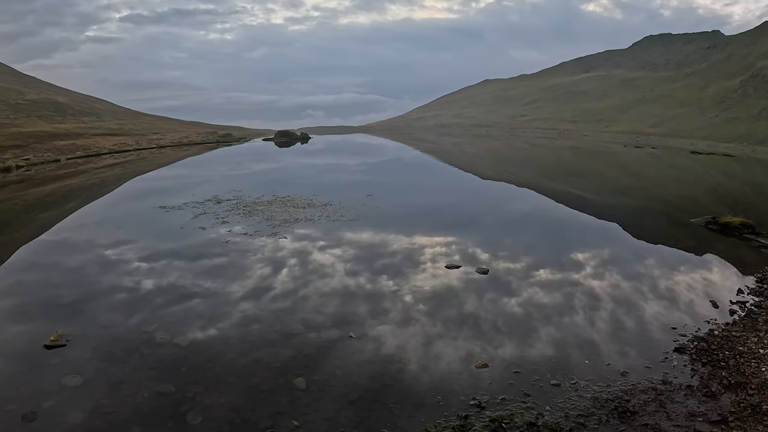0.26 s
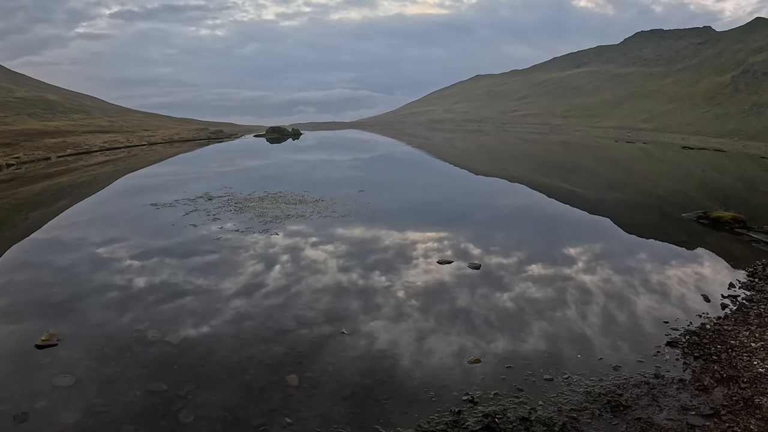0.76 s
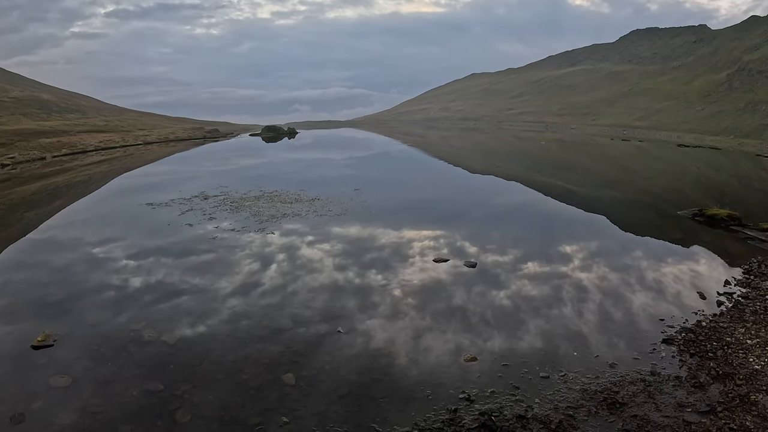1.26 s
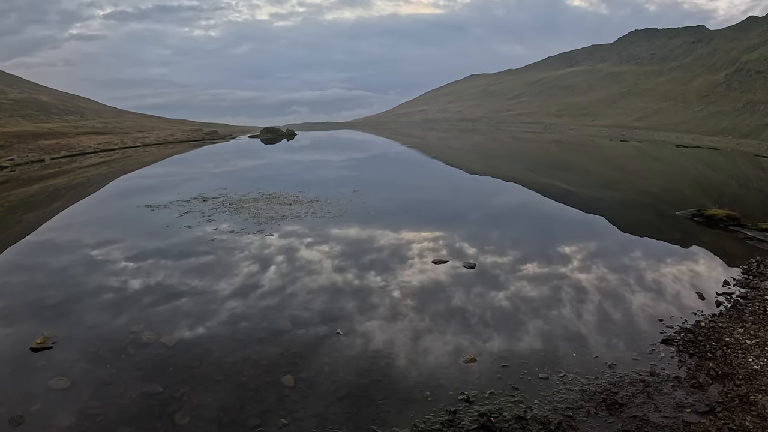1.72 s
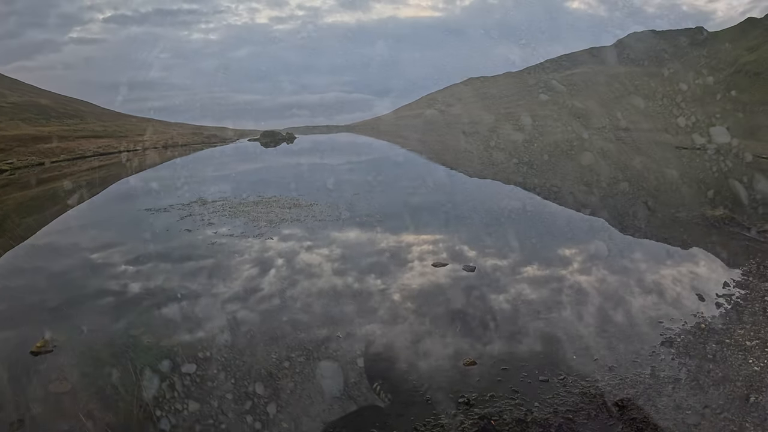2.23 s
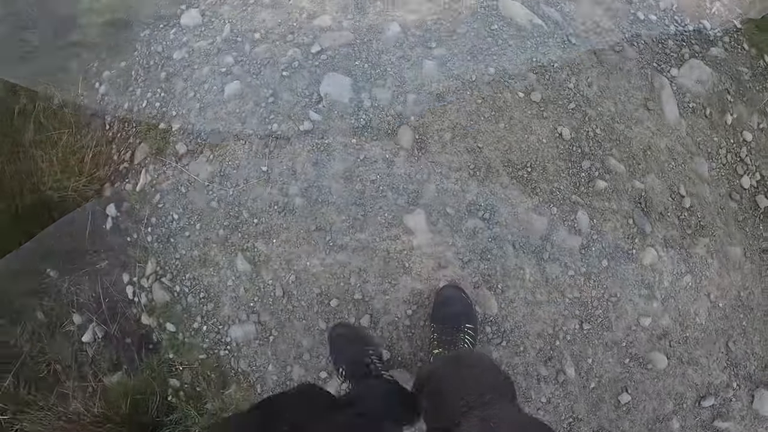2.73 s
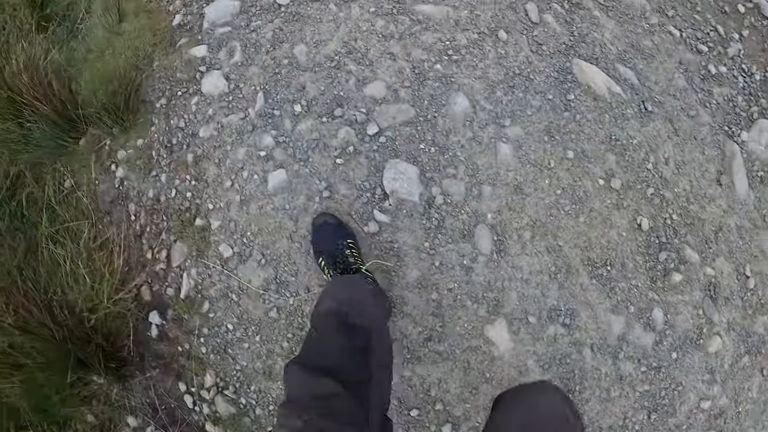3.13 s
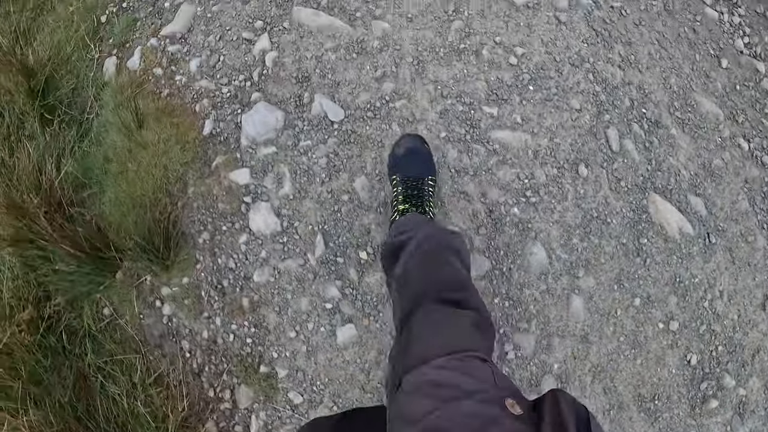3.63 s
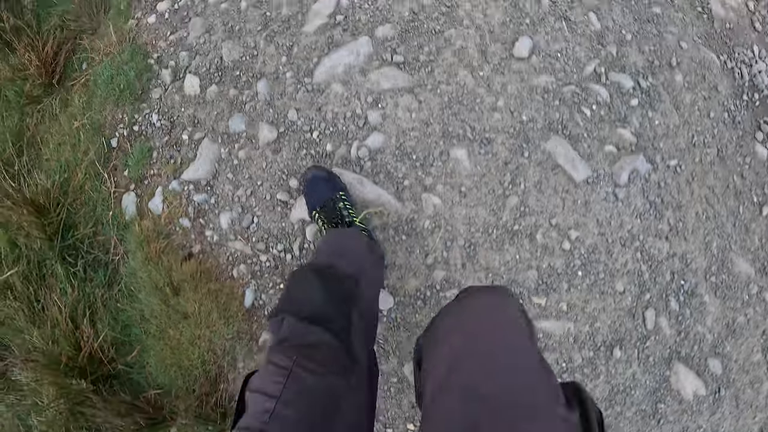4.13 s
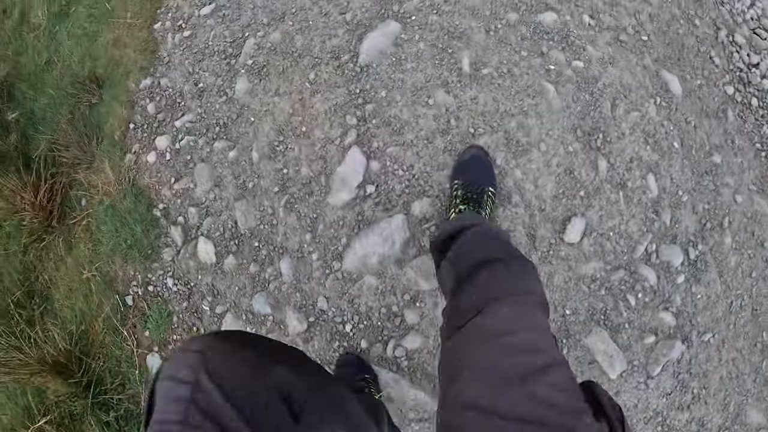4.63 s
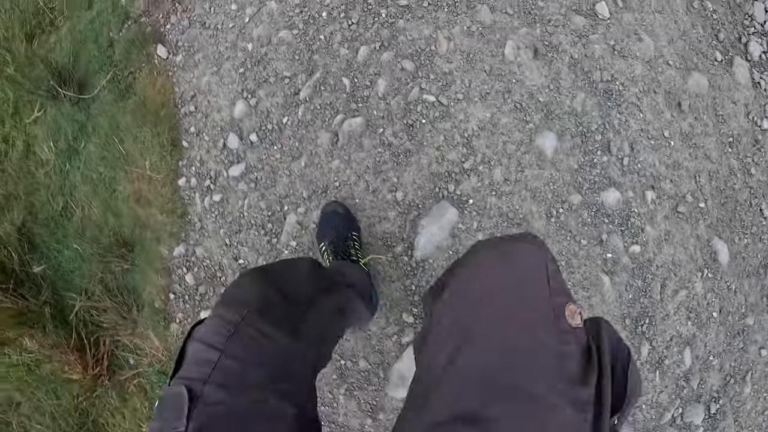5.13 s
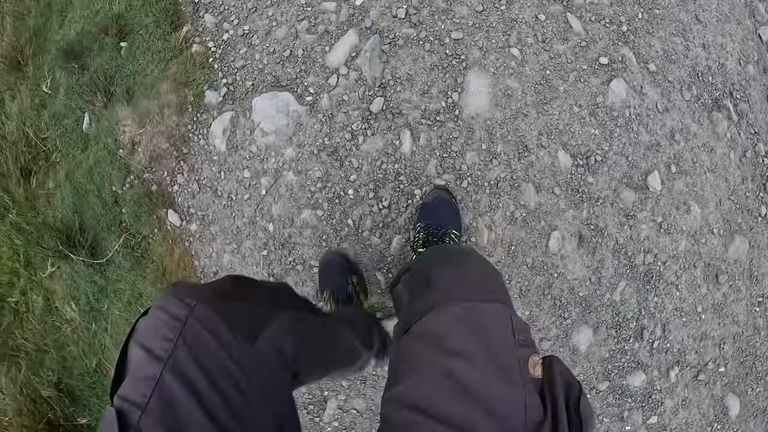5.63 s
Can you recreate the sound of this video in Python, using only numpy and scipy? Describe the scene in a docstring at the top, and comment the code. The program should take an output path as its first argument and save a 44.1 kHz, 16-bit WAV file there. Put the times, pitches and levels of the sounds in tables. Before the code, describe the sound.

After two seconds of nearly silent, faintly lapping lake water, boots crunch steadily over loose gravel, stones knocking and cracking underfoot.

```python
"""Boots walk on loose gravel, after a still mountain lake has lapped faintly and faded away.
Each step is a low heel thud, bursts of grinding grit, and single stones knocking and cracking.
The lake is soft shaped noise with tiny bubbles, low gulps of water and the gliding notes of a far bird.
Stones, bubbles and gulps are short dying swings; a small microphone colours everything."""
import sys
import numpy as np
from scipy import signal
from scipy.io import wavfile
from scipy.ndimage import uniform_filter1d

SR = 44100
rng = np.random.default_rng(int(sys.argv[2]) if len(sys.argv) > 2 else 0)


def generate_wav(sig):
    """Save sig (samples, or channels by samples) to the path in sys.argv[1] as 16-bit PCM at SR."""
    pcm = np.round(np.clip(np.atleast_2d(sig).T, -1, 1) * 32767).astype(np.int16)
    wavfile.write(sys.argv[1], SR, pcm)


N = 258426
T = np.arange(N) / SR  # the time of every sample [s]

# All levels below are those before the microphone colours the sound.
# Sound colour of the lapping water: (frequency [Hz], relative level [dB])
LAKE_COLOUR = [(25, -14), (70, -18.5), (116, -24), (130, -1), (300, -3.5), (430, -19), (510, -18.5),
               (650, -31), (1300, -14.5), (2600, -14), (6000, -20), (14000, -10)]
# Sound colour of the trickle of tiny bubbles: (frequency [Hz], relative level [dB])
TRICKLE_COLOUR = [(250, -3), (500, -4.5), (800, -4.5), (1300, -8), (2000, -7.5), (3500, -20.5)]
# Small bubbles at the shore: (start [s], peak level [dB], pitch [Hz])
BUBBLES = [(0.05, -58.5, 1340), (0.09, -63, 1390), (0.2, -70, 502), (0.31, -74, 510), (0.37, -59, 1290),
           (0.558, -64, 1210), (0.675, -61, 780), (0.699, -59, 1300), (1.045, -62, 1540),
           (1.111, -59, 1890), (1.15, -68, 510), (1.22, -66.5, 490), (1.288, -58.5, 1570),
           (1.373, -63, 493), (1.43, -60, 1260), (1.486, -67.5, 510), (1.853, -64, 653),
           (1.933, -62.5, 1220), (1.956, -59, 2240), (2.046, -57, 735)]
# Low gulps of water between shore stones: (time of the fullest swing [s], level [dB])
WATER_GULPS = [(0.0661, -67), (0.73, -60), (0.8358, -64), (0.8864, -64), (0.9526, -63), (1.1024, -59),
               (1.3, -60), (1.412, -58.5), (1.7597, -65), (1.81, -66)]
# Gliding notes of a far bird: (start [s], length [s], start pitch [Hz], end pitch [Hz], peak level [dB])
BIRD_NOTES = [(0.201, 0.012, 2330, 2600, -61.5), (0.211, 0.018, 3200, 4000, -70),
              (.52, .032, 4700, 5300, -71.5), (0.891, 0.02, 5250, 6300, -69.5),
              (.912, 0.024, 6250, 5850, -74), (.932, .012, 5850, 7000, -72), (.944, .016, 7000, 4900, -73),
              (1.005, .03, 5300, 4650, -70), (1.036, .014, 5200, 6200, -75), (1.97, .03, 4450, 4940, -74)]
# Sound colour of the coarse grit: (frequency [Hz], relative level [dB])
GRIT_COLOUR = [(300, -35.5), (600, 2.5), (1200, -1), (2000, -4), (3500, -8.5), (6000, -27.5)]
# Sound colour of the fine sand: (frequency [Hz], relative level [dB])
SAND_COLOUR = [(2000, 2), (3000, -3.5), (5000, -14.5), (8000, -33.5), (14000, -50.5)]
# Sound colour of the low rumble under the sole: (frequency [Hz], relative level [dB])
RUMBLE_COLOUR = [(25, -19.5), (60, -3.5), (150, -1.5), (250, -4), (400, -4.5), (700, -25.5)]
# Weight coming onto the gravel, footfalls and lighter toe scuffs:
# (time of full weight [s], grit [dB], fine sand [dB], sole rumble [dB], release [dB per s])
WEIGHT_LOADS = [(2.18, -64, -91, -59, 66), (2.5, -56.5, -61, -57.5, 56), (2.7, -71, -63.5, -62.5, 45),
                (2.92, -68, -58.5, -69, 40.5), (3.112, -41.5, -53, -43, 105.5), (3.52, -64.5, -64, -56, 31),
                (3.58, -56.5, -55, -64.5, 39.5), (3.66, -38.5, -58, -49, 51),
                (4.129, -38.5, -50.5, -43, 97.5), (4.28, -67, -65.5, -53, 78), (4.4, -51.5, -57, -56, 27),
                (4.6, -40.5, -49, -46.5, 96), (4.82, -58.5, -64, -55, 80), (4.911, -49.5, -69, -54.5, 102),
                (5.061, -40.5, -53.5, -45, 116), (5.3, -52, -69, -53, 77), (5.46, -42.5, -51, -48, 71),
                (5.77, -53, -72, -56.5, 62), (5.87, -36, -58, -43, 60)]
# Bursts of grinding under the sole:
# (start [s], level [dB], length [s], centre pitch [Hz], fine sand compared with grit [dB])
GRINDING_BURSTS = [(2.137, -45.5, 0.063, 1480, -3), (2.221, -54, 0.038, 1540, -7),
                   (2.436, -55.5, 0.036, 1480, -6), (2.466, -48, 0.044, 1370, -17),
                   (2.521, -49.5, .03, 1360, -22), (2.542, -47.5, 0.055, 1450, -28),
                   (3.081, -36.5, 0.012, 2070, -9), (3.092, -37, 0.03, 1200, 5),
                   (3.15, -32.5, 0.016, 1210, -2), (3.625, -31, 0.025, 1830, -9.5),
                   (3.649, -39.5, 0.056, 1390, -13), (3.718, -36, 0.052, 1190, -22),
                   (4.106, -33.5, 0.04, 1590, -6.5), (4.168, -39, 0.037, 1390, -16),
                   (4.552, -38, 0.042, 1390, -0.5), (4.557, -40.5, 0.052, 1330, -4.5),
                   (4.595, -31.5, 0.049, 1090, -25), (4.643, -36, 0.023, 2480, -24),
                   (4.79, -46, 0.052, 1230, -33), (4.978, -38, 0.076, 1200, -2),
                   (5.029, -34.5, 0.058, 1260, -9), (5.398, -37.5, 0.046, 1500, -5),
                   (5.452, -39, 0.031, 1960, -2), (5.478, -33.5, 0.054, 1200, -22),
                   (5.842, -33.5, 0.045, 1250, -8)]
# Stones knocking: (time of the fullest swing [s], level [dB], pitch [Hz])
STONE_KNOCKS = [(1.8311, -39.5, 1700), (2.4869, -34, 1110), (2.5218, -31, 1300), (2.5478, -25, 1330),
                (2.5572, -30.5, 1320), (2.7617, -41.5, 1420), (2.8134, -43, 730), (2.9127, -31, 1320),
                (2.9975, -31.5, 1560), (3.0137, -35, 1260), (3.0825, -29, 1470), (3.1006, -27, 990),
                (3.1402, -15, 1960), (3.1501, -10, 920), (3.1657, -16, 1220), (3.2071, -31, 1210),
                (3.5099, -14, 1220), (3.5156, -43, 1160), (3.6275, -28, 1800), (3.6347, -14.5, 1820),
                (3.6464, -20.5, 1330), (3.6591, -8.5, 1185), (3.6891, -25, 1480), (3.711, -25, 1350),
                (3.7299, -26, 1400), (3.7784, -25, 1400), (3.8349, -34, 1330), (3.8976, -24.5, 2360),
                (4.0587, -28.5, 1640), (4.1001, -30.5, 1430), (4.1172, -26, 2110), (4.1324, -20, 1030),
                (4.1796, -21.5, 2010), (4.1978, -25, 990), (4.4139, -34.5, 1070), (4.4548, -28, 1074),
                (4.5734, -20.5, 1330), (4.5889, -16, 1690), (4.5994, -10.5, 860), (4.612, -12.5, 1510),
                (4.6251, -18, 990), (4.6647, -15, 1680), (4.6712, -25, 1830), (4.7219, -38, 1510),
                (4.746, -33, 1460), (4.8161, -15.5, 1260), (4.8356, -32, 1270), (4.907, -33, 1090),
                (4.9905, -35, 1240), (5.0099, -29, 840), (5.039, -18.5, 1310), (5.0484, -13.5, 1290),
                (5.0574, -14.5, 1570), (5.067, -16.5, 1280), (5.1499, -34.5, 1270), (5.2134, -34, 1230),
                (5.4171, -21.5, 1570), (5.4238, -23, 1380), (5.4784, -22, 1130), (5.4875, -17.5, 1050),
                (5.495, -13, 1120), (5.5058, -9, 1190), (5.5127, -19, 1220), (5.5453, -21.5, 1320),
                (5.572, -30, 1620), (5.607, -27, 1280), (5.8369, -22.5, 1920), (5.8544, -23.5, 790)]
# Sharp cracks of small grit: (time of the fullest swing [s], level [dB], pitch [Hz])
GRIT_CRACKS = [(1.8309, -47, 3650), (2.7589, -39.5, 3720), (2.8589, -42.5, 4230), (3.0858, -29.5, 3610),
               (3.1095, -28, 3400), (3.1145, -37, 6700), (3.14, -25, 3460), (3.15, -25.5, 3350),
               (3.2276, -35, 3580), (3.5098, -48, 3200), (3.659, -30, 4220), (3.7965, -39, 3680),
               (3.8976, -25, 3950), (3.9438, -40, 3900), (4.1797, -31, 3340), (4.1852, -31, 4070),
               (4.397, -36, 3630), (4.6458, -22, 4400), (4.6537, -27.5, 4570), (4.7462, -35.5, 6000),
               (4.8161, -36, 3310), (4.8358, -36, 3280), (5.0665, -27, 3710), (5.0741, -26.5, 3800),
               (5.4591, -30, 3990), (5.5451, -27, 3600), (5.6508, -36, 3560)]
# Heel and sole meeting the ground: (time of the fullest swing [s], level [dB], pitch [Hz])
HEEL_THUDS = [(2.1734, -46, 272), (2.4498, -40.5, 215), (3.0856, -24, 195), (3.1009, -23.5, 365),
              (3.105, -18, 610), (3.1525, -20, 204), (3.1913, -33, 300), (3.2743, -39.5, 155),
              (3.5072, -29.5, 224), (3.6327, -29, 350), (3.7589, -42, 260), (3.807, -40.5, 190),
              (4.0637, -23, 231), (4.1153, -25.5, 334), (4.1671, -32.5, 300), (4.5196, -33.5, 272),
              (4.6025, -30, 390), (4.6172, -24, 268), (4.9947, -34, 198), (5.0113, -24.5, 404),
              (5.0581, -31.5, 316), (5.207, -31, 213), (5.2148, -33, 226), (5.5068, -26.5, 345),
              (5.8415, -30.5, 189), (5.853, -24, 600)]
# How the microphone colours the sound: (frequency [Hz], gain [dB])
MIC_COLOUR = [(600, 2), (800, -5), (1050, 1.03), (6000, -6.5), (8000, -15.5), (9050, -38), (10000, -29),
              (11500, -18.5), (13500, -32)]

FADE = (2.05, 2.9)  # the water fades out and the bed of gravel noise fades in [s]
LAKE_DB, TRICKLE_DB = -64.5, -9.5  # water level; trickle compared with the lapping
BUBBLE_CYCLES, GULP_HZ = 12.3, 284
# The next three rows each list grit, sand and rumble
PRESS_DB_PER_S = (399, 152, 301.5)  # how fast a load rises
RELEASE_SHARE = (1.0, 0.3, 0.66)  # share of the release rate at which each dies away
REST_DB = (-63.5, -70.5, -65)  # level between loads
KNOCK_CYCLES, CRACK_CYCLES, THUD_CYCLES = 1.31, 1.72, 0.99  # these stretch or shorten the swings
# Small stones slipping at random: rate, base level over the grit gain, extra unevenness, pitch range
LOOSE_PER_S, LOOSE_DB, LOOSE_SPREAD_DB, LOOSE_HZ = 30, 11.5, 4, (990, 2050)
# Small grit cracking at random: the same four settings
FLECKS_PER_S, FLECK_DB, FLECK_SPREAD_DB, FLECK_HZ = 15, 7, 6, (3260, 4370)
REFLECTIONS_DB = -10  # compared with the hits themselves
EDGE_HZ = 14300  # upper limit of the sound


def gain_of(db):
    """Turn decibels into a plain multiplier."""
    return 10 ** (np.asarray(db) / 20)


def evened(x):
    """Bring a signal to an average strength (RMS) of 1."""
    return x / np.sqrt(np.mean(x ** 2) + 1e-20)


def read(points, hz):
    """Read a sound colour at any frequency, with straight lines on a log frequency scale."""
    f, value = np.transpose(points)
    return np.interp(np.log(hz + 1), np.log(f + 1), value)


def add(mix, s, sound):
    """Lay a sound into the mix, starting at s seconds."""
    part = mix[round(s * SR):][:len(sound)]
    part += sound[:len(part)]


def no_bass(x, hz):
    """Remove sound below hz with a steep low cut."""
    return signal.sosfilt(signal.butter(4, hz, "high", fs=SR, output="sos"), x)


def ring(hz, cycles, glide=0., rise=.25):
    """A short damped swing, peak 1: a quick swell, then a fall of 26 dB over the given cycles."""
    u = np.arange(int(2 * cycles / hz * SR) + 8) * hz / SR / cycles
    envelope = (1 - np.exp(-(u / rise) ** 2)) * np.exp(-3 * u)
    swing = envelope * np.sin(2 * np.pi * cycles * u * (1 + glide * u))
    return swing / abs(swing).max()


def grains(colour, per_s, spread_db, cycles, count=14):
    """Many small sources of log-spaced pitch, each with its own sparse clicks of uneven size."""
    out = np.zeros(N)
    for hz in np.geomspace(colour[0][0], colour[-1][0], count):
        at, chance, side = rng.random((int(per_s / count * N / SR), 3)).T
        size_db = spread_db * np.minimum(-np.log(chance), 5)  # mostly small, a few large
        clicks = np.zeros(N)
        clicks[(at * N).astype(int)] = gain_of(size_db) * np.sign(side - .5)
        grain = ring(hz, cycles)
        grain = grain / np.linalg.norm(grain)
        strength = gain_of(read(colour, hz)) * np.sqrt(hz)  # higher sources cover wider bands
        out += strength * signal.oaconvolve(clicks, grain)[:N]
    return evened(out)


def wash(colour, patchy_db, size=2048):
    """Noise built from random short-time spectra, with patches that swell and sink."""
    hz = np.fft.rfftfreq(size, 1 / SR)
    a, b, patches = rng.standard_normal((4 * N // size + 5, len(hz), 3)).T
    patches = uniform_filter1d(patches, 6 * size // 2048, 0)  # smooth over frequency
    patches = evened(uniform_filter1d(patches, 5 * 2048 // size, 1))  # smooth over time
    spectra = (a + 1j * b) * gain_of(read(colour, hz)[:, None] + patchy_db * patches)
    return evened(signal.istft(spectra, nperseg=size, noverlap=3 * size // 4)[1][:N])


def blips(rows, rise, crack=0., cycles=1.5):
    """Swings that swell fast and die away; crack adds the brighter click of first contact."""
    out = np.zeros(N)
    for (s, db, hz), side in zip(rows, rng.choice([-1, 1], len(rows))):
        # u counts cycles, with 0 at the fullest swing
        u = np.arange(-int(3 * cycles / hz * SR), int(6 * cycles / hz * SR)) * hz / SR
        swell = np.exp(-(u / cycles / rise) ** 2)
        decay = np.exp(-abs(u / cycles / .6) ** 1.3)
        body = np.where(u < 0, swell, decay) * np.cos(2 * np.pi * u - .7)
        click = np.sin(2 * np.pi * 2.0 * u) * np.exp(-(u * 3.17) ** 2)  # a higher, shorter mode
        add(out, s + u[0] / hz, side * gain_of(db) * (body + crack * click))
    return out


def lapping_water():
    """Soft lapping is smooth noise; a trickle of many tiny ringing bubbles lies over it."""
    trickle = grains(TRICKLE_COLOUR, per_s=1500, spread_db=2.8, cycles=10, count=24)
    trickle = no_bass(no_bass(trickle, 150), 130)
    water = wash(LAKE_COLOUR, patchy_db=2.0, size=4096) + gain_of(TRICKLE_DB) * trickle
    return water * gain_of(LAKE_DB) * np.interp(T, FADE, [1, 0])


def shore_bubbles():
    """Each larger bubble rings like a small bell whose pitch glides up slightly."""
    out = np.zeros(N)
    for s, db, hz in BUBBLES:
        add(out, s, gain_of(db) * ring(hz, BUBBLE_CYCLES, glide=0.011))
    return out


def gulps():
    """Water gulping between stones gives low swings that all share one pitch."""
    rows = [(s, db, GULP_HZ) for s, db in WATER_GULPS]
    return no_bass(no_bass(blips(rows, rise=0.82, cycles=2.0), 140), 140)


def far_bird():
    """Each note is a pure tone gliding between two pitches with a slight random waver."""
    out = np.zeros(N)
    for s, length, start_hz, end_hz, db in BIRD_NOTES:
        hz = np.linspace(start_hz, end_hz, round(length * SR))
        wavering_hz = uniform_filter1d(hz * (1 + 0.13 * rng.standard_normal(len(hz))), 90)
        tone = np.sin(2 * np.pi * np.cumsum(wavering_hz) / SR)
        add(out, s, gain_of(db) * signal.windows.tukey(len(hz), .5) * tone)
    return out


def lake():
    """The lake is the sum of lapping water, bubbles, gulps and a far bird."""
    return lapping_water() + shore_bubbles() + gulps() + far_bird()


def weight(layer, t=T):
    """Gain of one layer (0 grit, 1 sand, 2 rumble): loads rise fast, then die away to a rest level."""
    power = (gain_of(REST_DB[layer]) * np.interp(t, FADE, [0, 1])) ** 2
    for s, *levels_db, release in WEIGHT_LOADS:
        before_db = PRESS_DB_PER_S[layer] * (s - t)
        after_db = RELEASE_SHARE[layer] * release * (t - s)
        power = power + gain_of(levels_db[layer] - np.maximum(before_db, after_db)) ** 2
    return np.sqrt(power)


def gravel_bed():
    """Grit, sand and rumble grow and shrink with the weight on the sole."""
    grit = grains(GRIT_COLOUR, per_s=4900, spread_db=2.5, cycles=3.0)
    sand = grains(SAND_COLOUR, per_s=9000, spread_db=0.0, cycles=1.4)
    rumble = wash(RUMBLE_COLOUR, patchy_db=4.0)
    return weight(0) * grit + weight(1) * sand + weight(2) * rumble


def close_reflections(x):
    """Sound bounces off legs and path as a short, sparse scatter of echoes."""
    t = np.arange(2600) / SR
    present = (rng.random(len(t)) < .05) * (t > .002)
    taps = rng.choice([-1, 1], len(t)) * present * gain_of(-60 * t / 0.037)  # falls 60 dB in 37 ms
    return signal.oaconvolve(x, taps / np.linalg.norm(taps))[:N]


def strays(per_s, over_db, spread_db, range_hz):
    """Rows (time [s], level [dB], pitch [Hz]) at random moments, louder under more weight."""
    at, chance, size = rng.random((int(per_s * (T[-1] - FADE[0])), 3)).T
    s = FADE[0] + at * (T[-1] - FADE[0])
    grit_db = 20 * np.log10(weight(0, t=s))
    db = grit_db + over_db + spread_db * np.minimum(-np.log(chance), 2)
    return list(zip(s, db, range_hz[0] * (range_hz[1] / range_hz[0]) ** size))


def crunches():
    """Each burst swells and dies off; its centre pitch shows the size of the stones that slip."""
    out = np.zeros(N)
    slips = grains(GRIT_COLOUR, per_s=4500, spread_db=2.0, cycles=3.97)
    sand = grains(SAND_COLOUR, per_s=7100, spread_db=3.5, cycles=4.5)
    push = wash(RUMBLE_COLOUR, patchy_db=1.5)
    for s, db, length, hz, sand_db in GRINDING_BURSTS:
        span = slice(round(s * SR), round((s + 2 * length) * SR))
        u = (T[span] - s) / length
        stones = signal.lfilter(*signal.iirpeak(hz, 1.6, SR), slips[span]) + .5 * slips[span]
        burst = evened(stones) + gain_of(sand_db) * sand[span] + gain_of(-11.0) * push[span]
        swell = np.clip(u / (8 * length), 0, 1)  # long bursts swell more gently
        add(out, s, gain_of(db) * burst * swell * np.exp(-u ** 3))
    return out


def grit_cracks():
    """Small grit cracks as high, short swings with a strong click."""
    rows = GRIT_CRACKS + strays(FLECKS_PER_S, FLECK_DB, FLECK_SPREAD_DB, FLECK_HZ)
    return blips(rows, rise=0.5, crack=0.57, cycles=CRACK_CYCLES)


def stone_knocks():
    """Knocking stones ring for a few cycles with a light click of contact."""
    rows = STONE_KNOCKS + strays(LOOSE_PER_S, LOOSE_DB, LOOSE_SPREAD_DB, LOOSE_HZ)
    return blips(rows, rise=0.37, crack=0.21, cycles=KNOCK_CYCLES)


def heel_thuds():
    """The heel and sole give a low, dull swing as they meet the ground."""
    return no_bass(blips(HEEL_THUDS, rise=0.35, cycles=THUD_CYCLES), 55)


def footsteps():
    """The blows and grinding of each step, with their close reflections."""
    hits = crunches() + grit_cracks() + stone_knocks() + heel_thuds()
    return hits + gain_of(REFLECTIONS_DB) * close_reflections(hits)


def scene():
    """Add the lake, the bed of gravel noise and the footsteps as one channel."""
    return (lake() + gravel_bed() + footsteps())[None]


def record(dry):
    """The microphone housing colours the sound, then the highest treble is cut off."""
    hz = abs(np.fft.fftfreq(4096, 1 / SR))
    log_gain = np.log(gain_of(read(MIC_COLOUR, hz)))
    # The Hilbert transform finds the phase that keeps the filter from answering before the sound
    housing = np.fft.ifft(np.exp(np.conj(signal.hilbert(log_gain)))).real[:2048]
    coloured = signal.oaconvolve(dry, housing[None])[:, :N]
    treble_cut = signal.firwin(511, EDGE_HZ, window=("kaiser", 9), fs=SR)
    return signal.oaconvolve(coloured, treble_cut[None], "same")


dry = scene()
out = record(dry)
generate_wav(out)
```